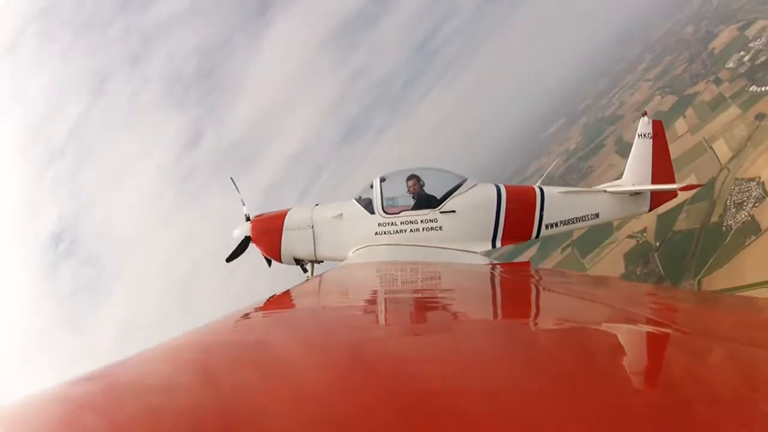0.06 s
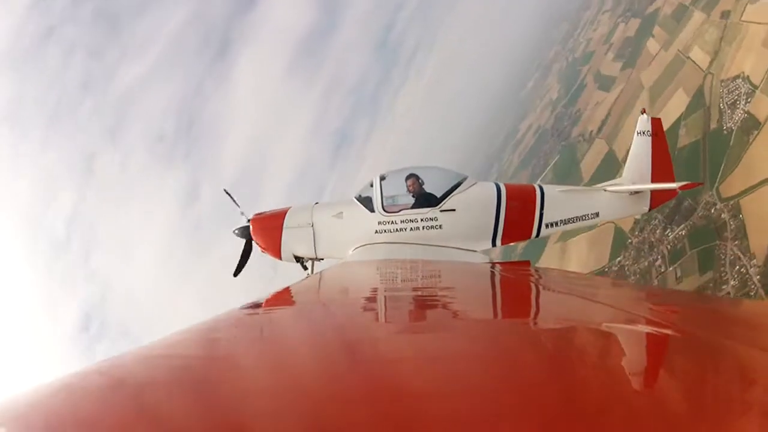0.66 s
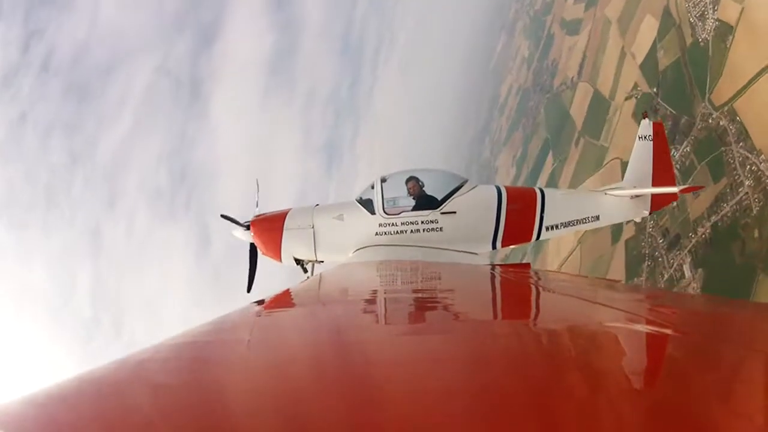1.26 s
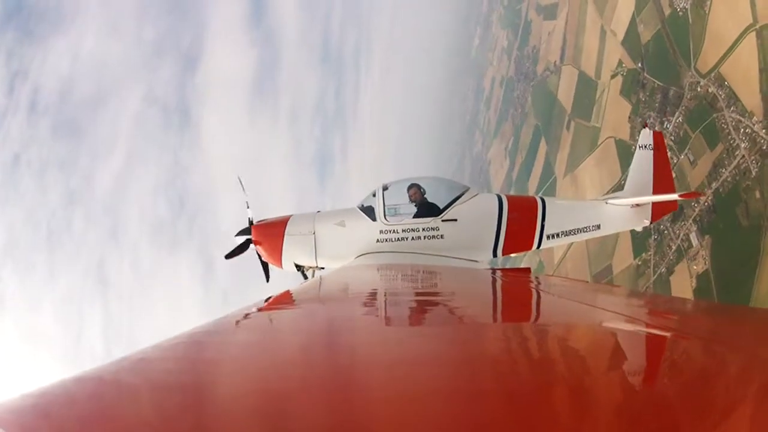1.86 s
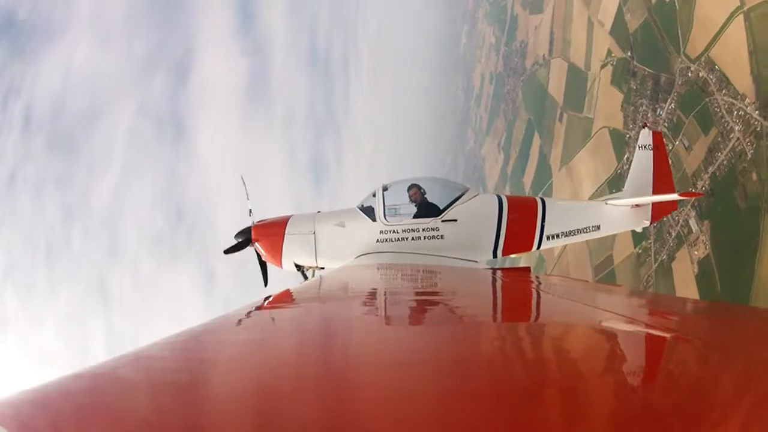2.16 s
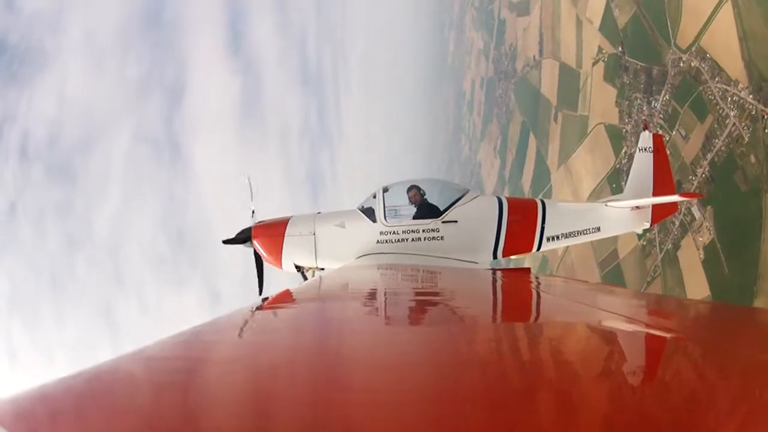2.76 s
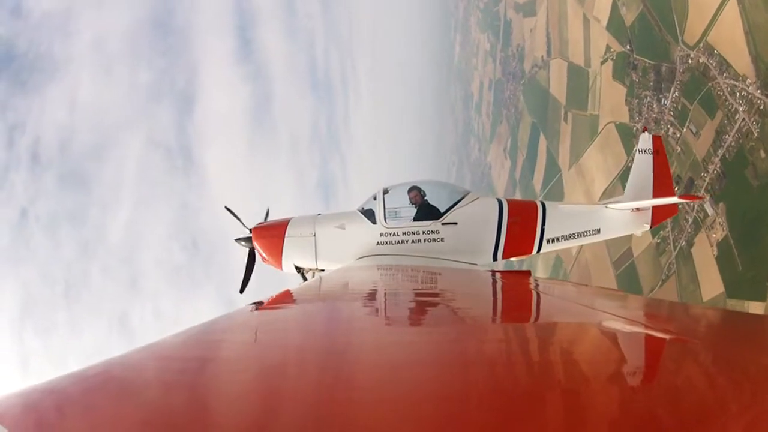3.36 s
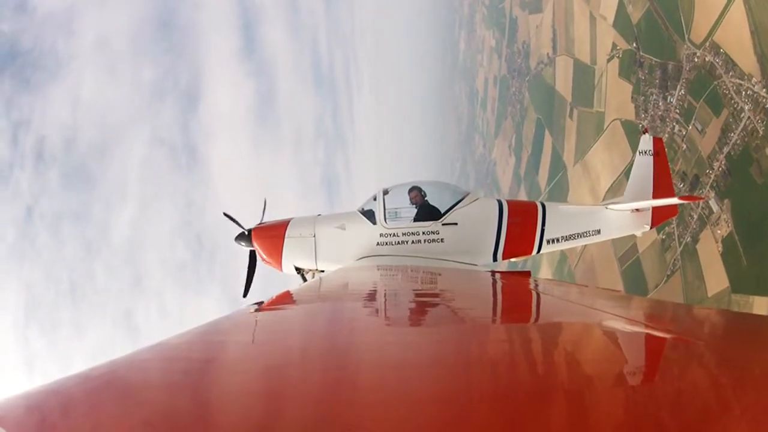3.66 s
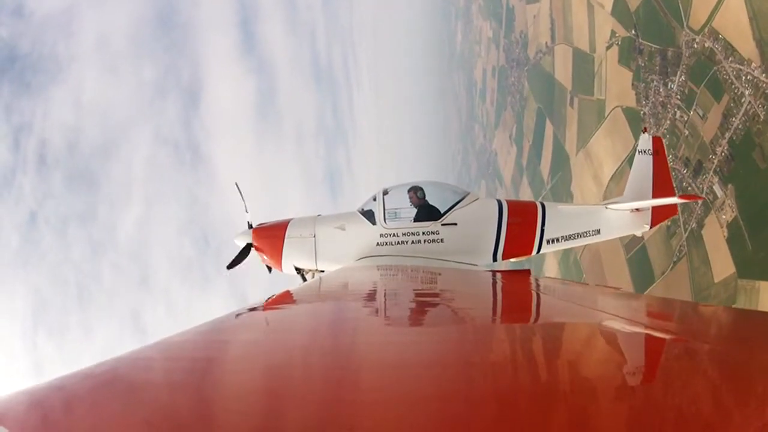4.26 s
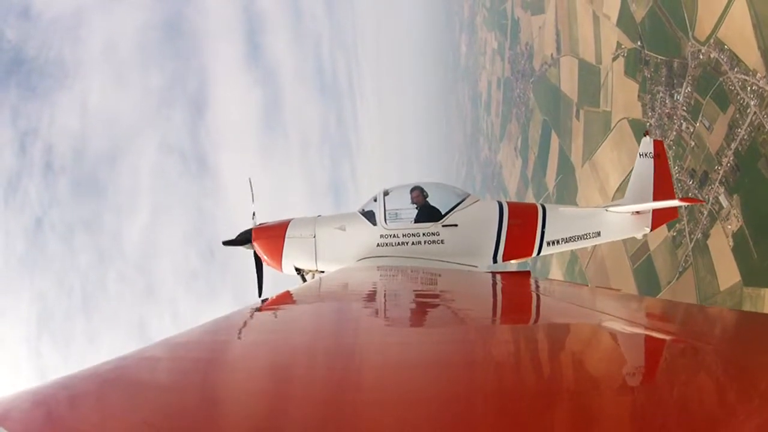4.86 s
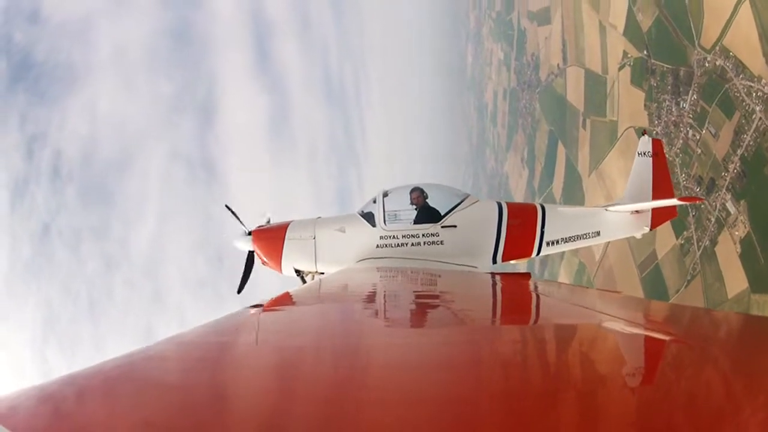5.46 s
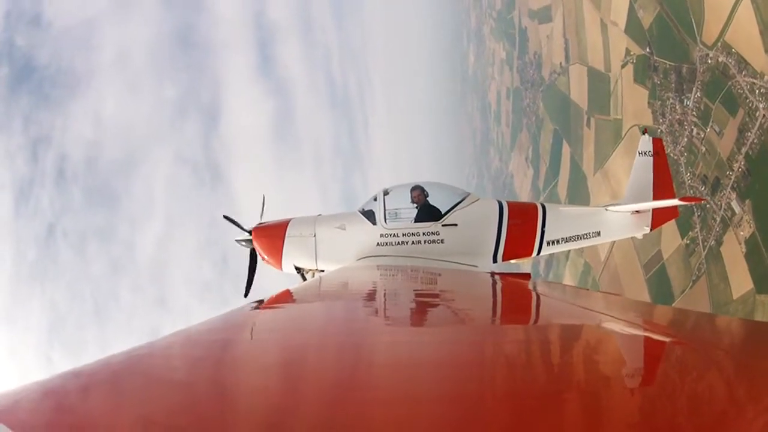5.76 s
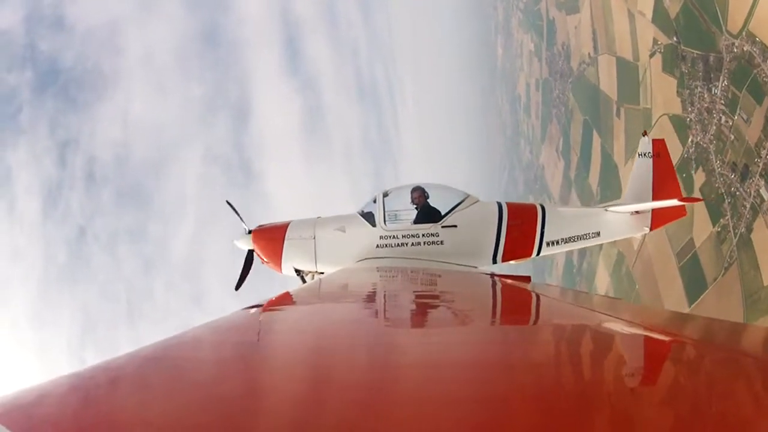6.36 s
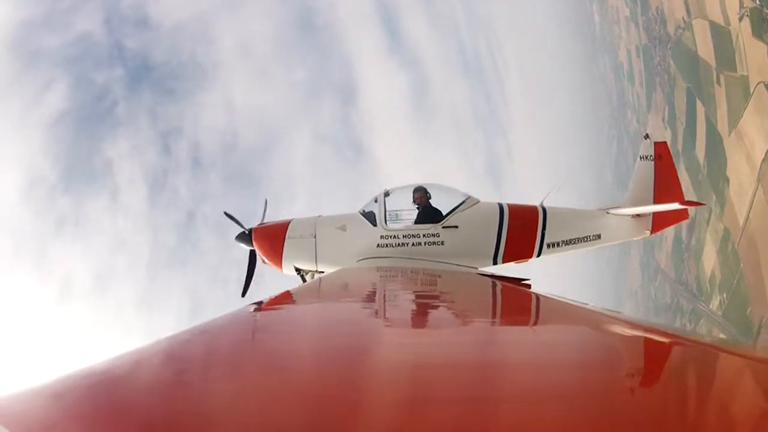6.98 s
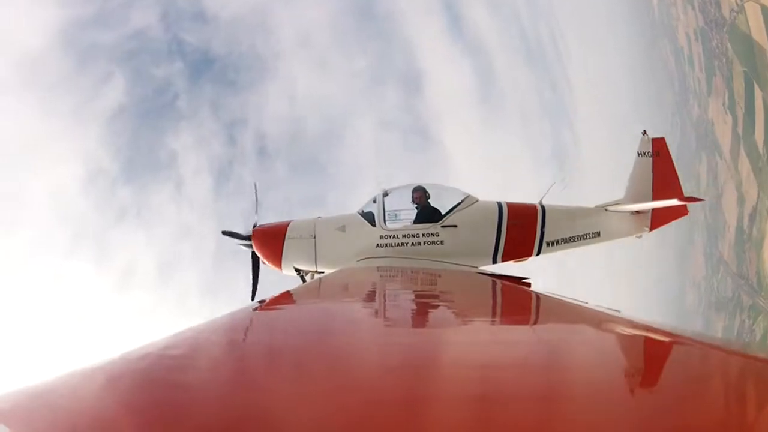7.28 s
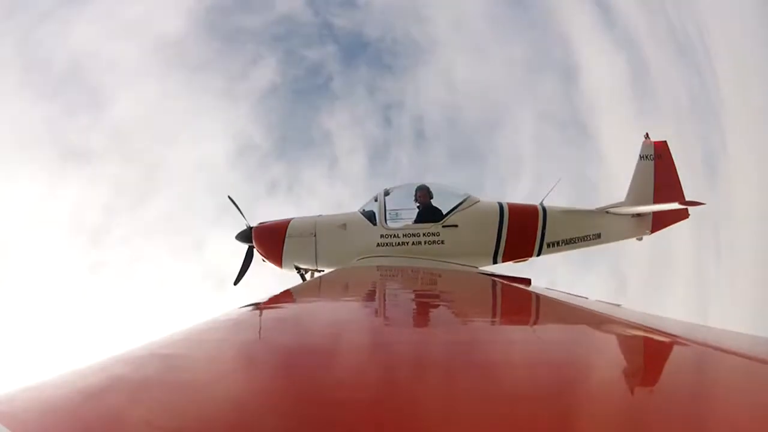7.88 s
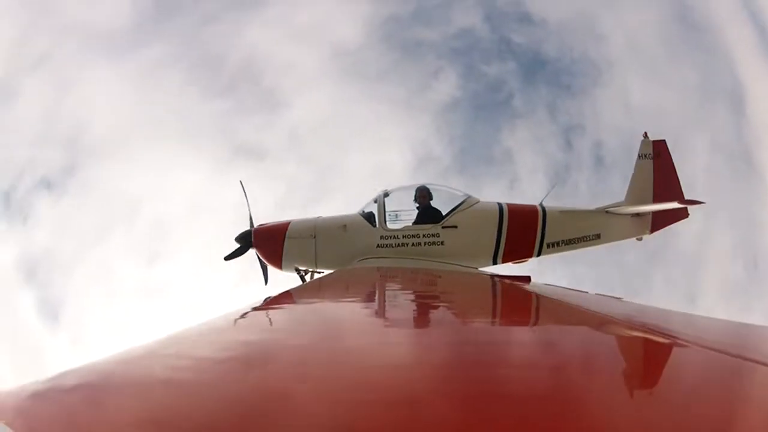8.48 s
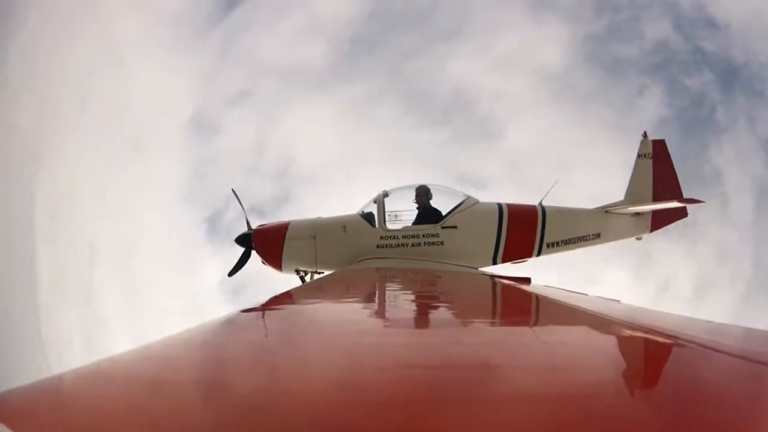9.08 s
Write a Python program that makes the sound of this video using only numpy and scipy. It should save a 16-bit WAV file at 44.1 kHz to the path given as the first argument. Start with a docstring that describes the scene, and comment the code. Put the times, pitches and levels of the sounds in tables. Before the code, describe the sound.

Rushing air turns to a thumping roar, giving way to a small plane's rasping propeller drone with light rattling.

```python
"""A small aerobatic plane drones through a roll, heard from a camera fixed to its wing.
Its three propeller blades push out pulses of pressure, and its four-cylinder engine fires twice a turn.
At first the rushing air hides them: it hisses over the camera housing, then breaks into a thumping roar.
As the microphone comes into shelter, the wind falls away and the drone comes through,
loud enough to overload the microphone with a buzzy rasp and to rattle the mount."""
import sys
import numpy as np
from scipy import signal
from scipy.fft import rfft, irfft, next_fast_len
from scipy.io import wavfile
from scipy.ndimage import uniform_filter1d

SR = 44100
rng = np.random.default_rng(int(sys.argv[2]) if len(sys.argv) > 2 else 0)


def int16_out(signal):
    """Quantize to a 16-bit WAV file."""
    q = np.round(np.clip(np.atleast_2d(signal).T, -1, 1) * 32767)
    wavfile.write(sys.argv[1], SR, q.astype(np.int16))


N = 407043
TIME = np.arange(N) / SR

# Shelter from the wind. Each row: time in seconds, share from 0 (open) to 1 (sheltered).
SHELTER = [(0, 0), (5.6, 0.02), (6.25, 0.8), (6.6, 1), (9.23, 0.98)]
# How hard the wind hits the housing. Each row: time in seconds, relative level in dB.
WIND_FORCE = [(0, -32.5), (1.58, -29), (1.72, -26), (2.7, -24.5), (3.8, -25), (5.6, -24), (6.3, -16.5),
              (6.55, -20.5), (7.6, -22.5), (9.23, -29.5)]
# The tone of the four air noises. Each row: frequency in Hz, relative level in dB.
HISS_SPECTRUM = [(150, -51), (600, -25), (820, -9.5), (1550, -7.5), (1880, -2.5), (2250, -6.5),
                 (2780, -1.5), (3300, -6), (3780, -1.5), (4300, -11.5), (5000, -12.5), (5700, -13.5)]
THUMP_SPECTRUM = [(12, -14), (30, -4), (60, 16), (100, 11), (160, 15.5), (300, -24), (800, -94)]
ROAR_SPECTRUM = [(25, -33), (70, -4.5), (130, -1), (200, 0), (300, 0.5), (450, -0.5), (630, -4.5),
                 (760, -8), (950, -14), (1250, -22), (1550, -22), (1880, -24), (2800, -33), (6000, -43)]
WASH_SPECTRUM = [(300, -14), (900, -28), (1450, -1.5), (1950, 6.5), (2600, 7), (3300, -0.5), (4400, -2),
                 (6000, -7.5)]
# How the hiss dulls, then thins. Each row: time in seconds, treble slope in dB per octave.
HISS_TILT = [(0, -1), (1.3, 0), (2.2, -5.5), (5, -8.5), (6.3, -2)]
# The size of the eddies (swirls of air) shifts the roar. Each row: time in seconds, frequency factor.
EDDY_PITCH = [(0, 1.05), (1.4, 0.85), (1.7, 0.95), (4.2, 1.064), (5.5, 0.98), (6.3, 0.79), (9.23, 0.93)]
# The hardest knocks of the mount. Each row: start in seconds, relative level in dB.
HARD_KNOCKS = [(6.2536, -27), (6.7259, -24), (6.7785, -25), (6.8317, -28), (6.8587, -24), (6.988, -25),
               (7.1703, -23), (7.1955, -20), (7.2739, -22), (7.351, -28), (7.3782, -22), (7.6083, -22),
               (7.7105, -18.5), (8.1884, -23), (8.8746, -23), (8.9751, -25), (8.994, -24), (9.0662, -26)]
# How the mount rings. Each row: frequency in Hz, relative level in dB, seconds to fade by 60 dB.
MOUNT_RING = [(2716.5, -10, .003), (3900, 30, 0.0015), (4420, 5, 0.0034), (5300, -32, 0.00098)]
# The buzzy overload rasp on the loud drone. Each row: multiple of the shaft speed, relative level in dB.
OVERLOAD_TONES = [(21, -40), (22, -39), (24, -36), (25, -38), (27, -36.5), (28, -38), (30, -42), (31, -38),
                  (34, -40.5)]
# The drone's changing tone. Each row: time in seconds, exhaust pipe boost in dB, overload boost in dB.
DRONE_COLOUR = [(5.8, 14.5, -8), (6.5, 0.5, -5), (7.0, 1.5, -8), (7.7, 1, 0), (8.3, -5.5, 1),
                (9.23, -4, 2.5)]
# Exhaust and engine block. Each row: multiple of the shaft speed, relative level in dB.
ENGINE_TONES = [(2, -13.5), (4, -27.5), (7, -24.5), (8, -25.5), (10, -31), (11, -31), (12, -30), (13, -32),
                (14, -22.5), (16, -20), (17, -24), (18, -26.5)]
# The propeller's hum. Each row: multiple of the blade rate, relative level in dB.
BLADE_TONES = [(1, 0.5), (2, -4.5), (3, -11.5)]
# The propeller's speed. Each row: time in seconds, blade passes per second.
BLADE_RATE = [(4.7, 111.7), (5.6, 112.5), (6.3, 113.7), (6.9, 115), (7.7, 117.1), (8.1, 118.2),
              (8.5, 119.1), (9.23, 119.8)]
# How the drone swells. Each row: time in seconds, relative level in dB.
DRONE_LEVEL = [(0, -53), (4.6, -40.5), (5.2, -33), (6.0, -28), (6.6, -20), (6.9, -19), (9.23, -19)]

BREAK_S, BREAK_RISE_S = 1.49, 0.53  # when the smooth flow breaks away from the housing, and how quickly


def gain_of(db):
    """Turns decibels into a factor to multiply by."""
    return 10 ** (np.asarray(db) / 20)


def unit_level(x):
    """Scales a signal to an average (rms) level of 1."""
    return x / np.sqrt(np.mean(x ** 2) + 1e-20)


def curves(rows):
    """Turns each column of a timed table into one value per sample."""
    s, *columns = np.transpose(rows)
    return [np.interp(TIME, s, column) for column in columns]


def coloured(x, spectrum):
    """Filters x with a spectrum table and scales it to level 1."""
    hz, db = np.transpose(spectrum)
    size = next_fast_len(N)
    shape_db = np.interp(np.log(np.fft.rfftfreq(size, 1 / SR) + 1), np.log(hz), db)
    return unit_level(irfft(rfft(x, size) * gain_of(shape_db), size)[:N])


def moving_filter(x, gain_db):
    """Filters x by a rule gain_db(Hz, seconds) that changes over time."""
    hz, s, slices = signal.stft(x, SR, nperseg=1024)
    return signal.istft(slices * gain_of(gain_db(hz[:, None] + 1, s)), SR, nperseg=1024)[1][:N]


def flattened(x, amount):
    """Presses down the brief peaks of a noise, so it sounds dense and even."""
    power = uniform_filter1d(x ** 2, size=40) / uniform_filter1d(x ** 2, size=4000)
    return x * np.maximum(power, .01) ** (-amount / 2)


def wander(hz):
    """A smooth random drift of level 1, mostly slower than hz."""
    count = 8192
    f = np.fft.rfftfreq(count, TIME[-1] / count)
    slow = irfft(rfft(rng.standard_normal(count)) * np.exp(-(f / hz) ** 2))
    return unit_level(np.interp(TIME, np.linspace(0, TIME[-1], count), slow))


def once_a_turn(turns, sharpness):
    """A smooth bump of height 1 at every whole turn."""
    return np.exp(sharpness * (np.cos(2 * np.pi * turns) - 1))


def eddies(depth_db, hz):
    """White noise that flares as swirls of air pass."""
    return rng.standard_normal(N) * gain_of(depth_db * wander(hz))


def since_break(span_s):
    """Rises from 0 to 1 over span_s once the flow breaks away."""
    return np.clip((TIME - BREAK_S) / span_s, 0, 1)


def broken_flow(sudden=0.52, rest_s=3.0):
    """The share of the flow that has broken away: a sudden part, then the rest."""
    return sudden * since_break(BREAK_RISE_S) + (1 - sudden) * since_break(rest_s)


def hiss(gusts, shelter, start_db=-24.5, tearing=0.2):
    """Fast air sounds the hollows of the housing; as the flow breaks, the hiss dulls, tears and fades."""
    tilt, = curves(HISS_TILT)
    broken = broken_flow()
    air = coloured(eddies(depth_db=1.5 * broken, hz=90), HISS_SPECTRUM)
    tilt_db = lambda f, s: np.log2(np.clip(f, 900, 6000) / 3000) * np.interp(s, TIME, tilt)
    air = flattened(moving_filter(air, tilt_db), amount=0.3 * (1 - since_break(BREAK_RISE_S)))
    # the pressure of the roar opens and chokes the hiss
    bursts = np.exp(tearing * broken * gusts)
    bursts /= np.sqrt(uniform_filter1d(bursts ** 2, size=8000))
    # a drop at the break, then an ever faster fade
    after_s = np.maximum(TIME - BREAK_S, 0)
    level_db = start_db - 3 * since_break(BREAK_RISE_S) - 2 * after_s - 0.59 * after_s ** 2
    return air * bursts * gain_of(level_db) * np.sqrt(1 - shelter)


def thumps(wind_db, offset_db=-16.5, smooth_db=-7, slam_s=6.49, slam_db=11):
    """Large eddies thump on the housing, with one heavy slam at the edge of the shelter."""
    slam = np.exp(-((TIME - slam_s) / 0.15) ** 2)
    smooth = 1 - since_break(BREAK_RISE_S)
    level_db = wind_db + offset_db + smooth_db * smooth + slam_db * slam
    return coloured(eddies(depth_db=3.5, hz=7.9), THUMP_SPECTRUM) * gain_of(level_db)


def roar(turns, shelter, chop_depth=0.85):
    """Air roars as it breaks away from the housing; in shelter, the passing blades chop it."""
    hz, db = np.transpose(ROAR_SPECTRUM)
    chop = 1 + chop_depth * shelter * (once_a_turn(3 * turns - 0.095, sharpness=1.8) - 1 / 3)
    air = eddies(depth_db=0.98 * broken_flow(), hz=59.7) * chop
    pitch = lambda s: np.interp(s, *np.transpose(EDDY_PITCH))
    colour_db = lambda f, s: np.interp(np.log(f / pitch(s)), np.log(hz), db)
    return unit_level(moving_filter(air, colour_db))


def propeller_wash(turns, shelter, peak_s=6.8, peak_db=-38):
    """Each blade throws a puff of hiss over the wing, with an extra puff once a turn."""
    blade_puffs = once_a_turn(3 * turns + 0.1, sharpness=2.6)
    turn_puffs = 0.33 * once_a_turn(turns - .12, sharpness=6.7)
    air = coloured(eddies(depth_db=1.8, hz=151) * (1 + blade_puffs + turn_puffs), WASH_SPECTRUM)
    # swells quickly and ebbs slowly
    late_s = TIME - peak_s
    level_db = peak_db + np.where(late_s < 0, np.maximum(9 * late_s, -5), -1.67 * late_s)
    return air * gain_of(level_db) * np.sqrt(shelter)


def mount_rattle(turns, blade_hz, drone_db, ticks_per_s=90, db_per_hz=1):
    """The shaking mount ticks in step with the blades, most at one point of the turn, at times hard."""
    chance = once_a_turn(3 * turns - .82, sharpness=3.4)
    chance *= 0.12 + once_a_turn(turns - .3, sharpness=2.2)
    ticks = rng.random(N) < ticks_per_s / SR * chance / chance.mean()
    # ticks grow as the drone gets louder and the blades get faster
    tick_db = drone_db - 15 + db_per_hz * (blade_hz - blade_hz[-1])
    knocks = ticks * gain_of(tick_db + 2.4 * np.minimum(rng.exponential(1, N), 3))
    for s, db in HARD_KNOCKS:
        knocks[round(s * SR)] += gain_of(db + 3)
    t = TIME[:SR // 100]
    # every knock scuffs for a moment after the first contact
    scuffs = 0.25 * rng.standard_normal(N) * signal.oaconvolve(knocks, np.exp(-t / 0.00068))[:N]
    ring = sum(gain_of(db - 60 * t / fade_s) * np.cos(2 * np.pi * hz * t) for hz, db, fade_s in MOUNT_RING)
    return signal.oaconvolve(knocks + scuffs, ring / abs(ring).max())[:N]


def overload_rasp(turns, boost_db):
    """A buzzy overload rasp on the loud drone: high tones line up into one short snap each turn."""
    phase = 2 * np.pi * (turns - .265)
    snap = sum(gain_of(db) * np.cos(multiple * phase) for multiple, db in OVERLOAD_TONES)
    return np.sqrt(2) * gain_of(boost_db - 1) * snap


def engine(turns, shaft_hz, pipe_db, pipe_hz=647, pipe_width_hz=77, rough_db=0.5, uneven_db=-26):
    """Two firings a turn make a low note; the exhaust pipe colours the overtones near its own pitch."""
    tone = lambda multiple: np.cos(2 * np.pi * (multiple * turns + rng.random()))
    firing = gain_of(ENGINE_TONES[0][1]) * np.sin(2 * np.pi * 2 * turns)
    for multiple, db in ENGINE_TONES[1:]:
        in_pipe = np.exp(-((multiple * shaft_hz - pipe_hz) / pipe_width_hz) ** 2)
        firing += gain_of(db + pipe_db * in_pipe + rough_db * wander(11)) * tone(multiple)
    # unequal cylinders add weak tones halfway between the whole multiples
    uneven = unit_level(sum(tone(k + .5) for k in range(2, 18)))
    return np.sqrt(2) * firing + gain_of(uneven_db) * uneven


def propeller(turns, lag_radians=0.43):
    """Three blades pass each turn, each a pressure peak that rises slowly and drops faster."""
    phase = 2 * np.pi * 3 * turns
    hum = sum(gain_of(db) * np.cos(k * phase - lag_radians * (k - 1)) for k, db in BLADE_TONES)
    return np.sqrt(2) * hum


def scene(sheltered_db=-9.0):
    """The drone comes through as the wind falls away."""
    blade_hz, = curves(BLADE_RATE)
    drone_db, = curves(DRONE_LEVEL)
    pipe_db, overload_db = curves(DRONE_COLOUR)
    wind_db, = curves(WIND_FORCE)
    shelter, = curves(SHELTER)
    shaft_hz = blade_hz / 3
    turns = np.cumsum(shaft_hz) / SR + .0012 * wander(9)  # shaft turns so far, with a slight wobble
    gusts = roar(turns, shelter)
    wind = thumps(wind_db) + gusts * gain_of(wind_db + 2 + sheltered_db * shelter)
    air = hiss(gusts, shelter) + propeller_wash(turns, shelter)
    rattle = mount_rattle(turns, blade_hz, drone_db)
    drone = overload_rasp(turns, overload_db) + engine(turns, shaft_hz, pipe_db) + propeller(turns)
    return (wind + air + rattle + gain_of(drone_db + 0.44) * drone)[None]


def record(dry, sample_hz=12000, ceiling=.291, top_hz=15250):
    """The camera samples coarsely, overloads, and holds each sample, mirroring sound into the treble."""
    input_filter = signal.firwin(91, 5700, fs=SR)
    dulled = signal.oaconvolve(dry, input_filter[None], "same")
    coarse = signal.resample_poly(dulled, 4 * sample_hz, SR, axis=1)[:, ::4]
    held = np.repeat(np.clip(coarse, -ceiling, ceiling), 4, axis=1)
    full_rate = signal.resample_poly(held, SR, 4 * sample_hz, axis=1)[:, :N]
    top_filter = signal.firwin(511, top_hz, window=("kaiser", 9), fs=SR)
    return signal.oaconvolve(full_rate, top_filter[None], "same")


dry = scene()
out = record(dry)
int16_out(out)
```